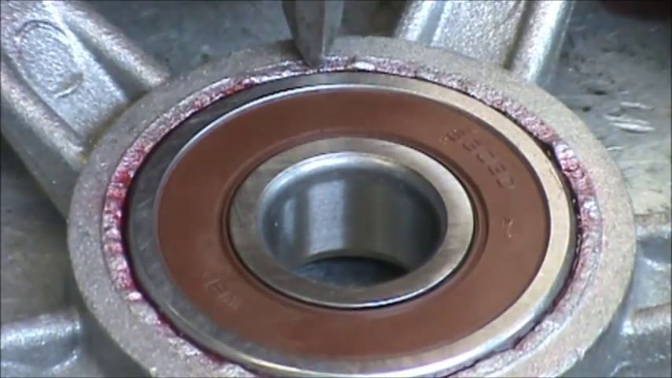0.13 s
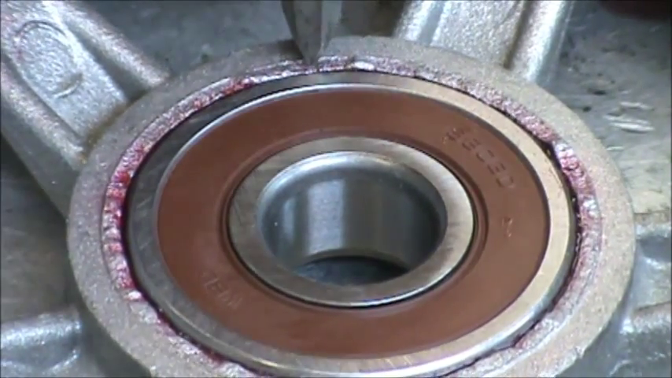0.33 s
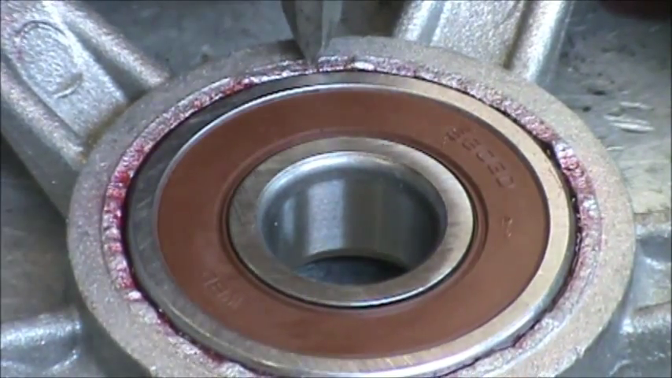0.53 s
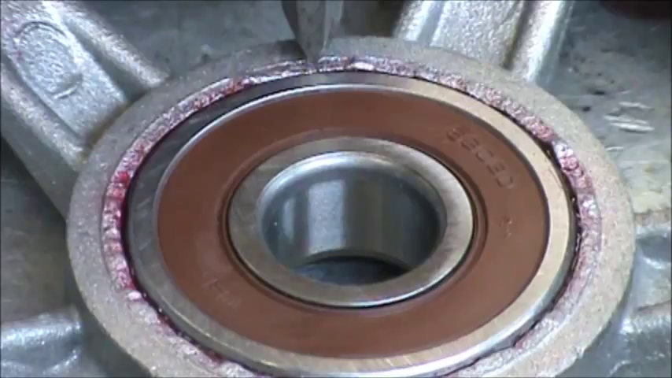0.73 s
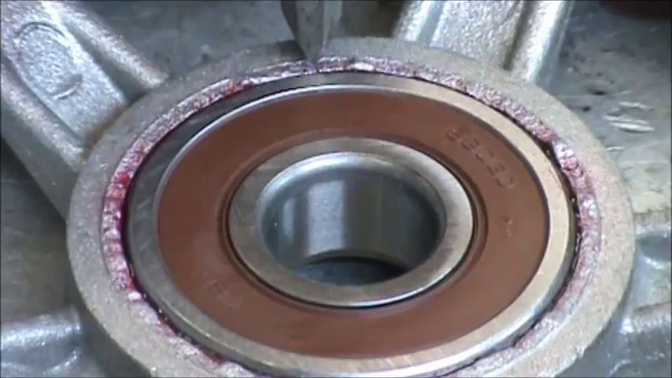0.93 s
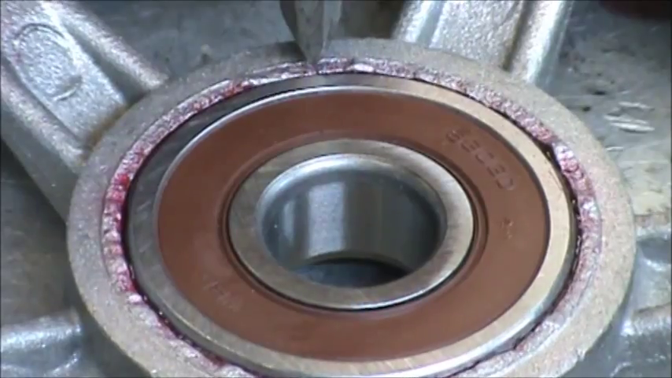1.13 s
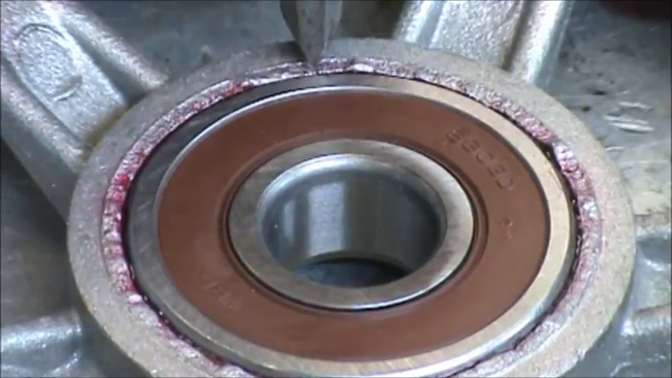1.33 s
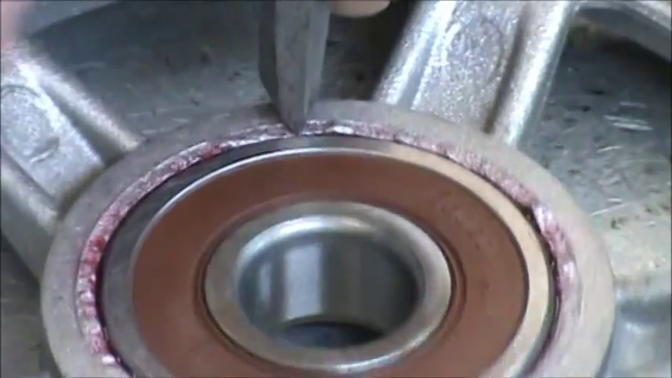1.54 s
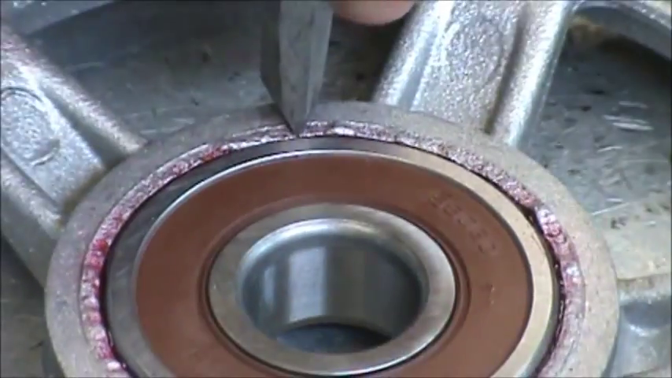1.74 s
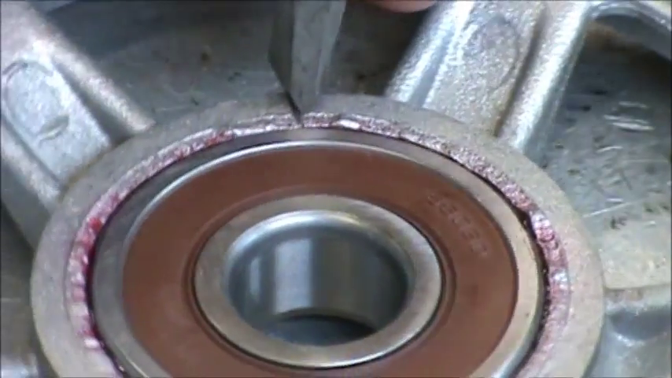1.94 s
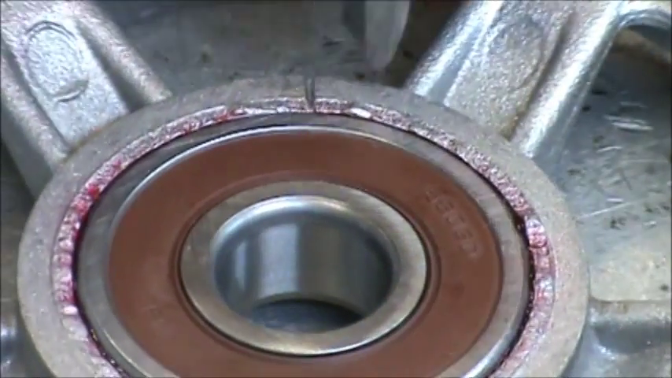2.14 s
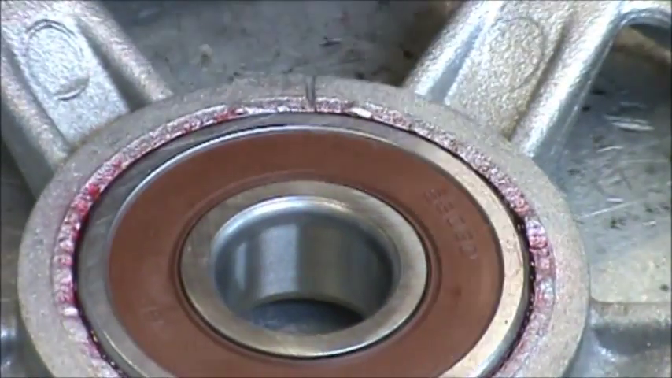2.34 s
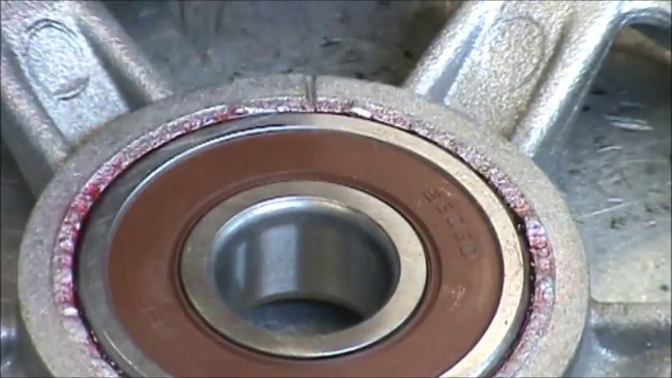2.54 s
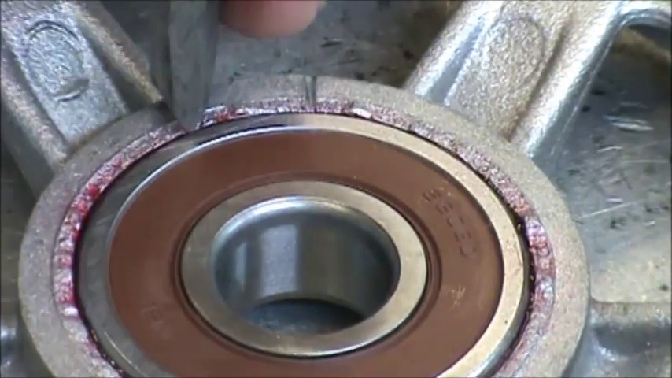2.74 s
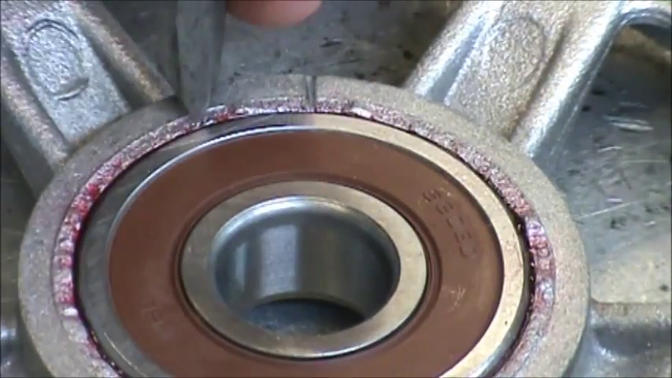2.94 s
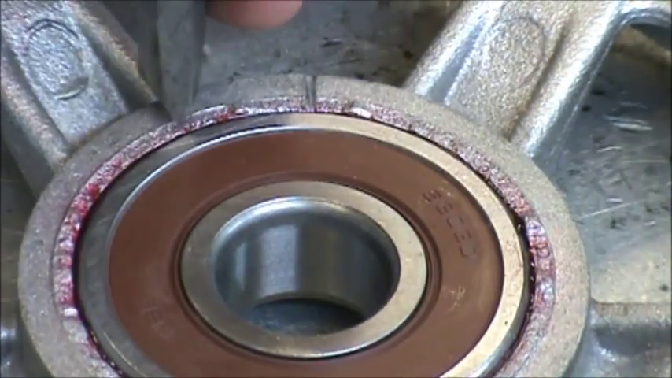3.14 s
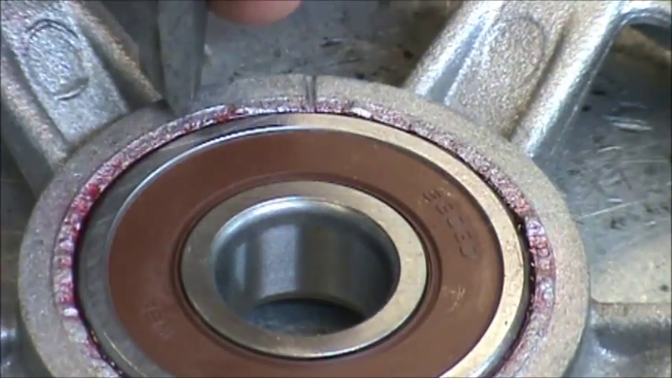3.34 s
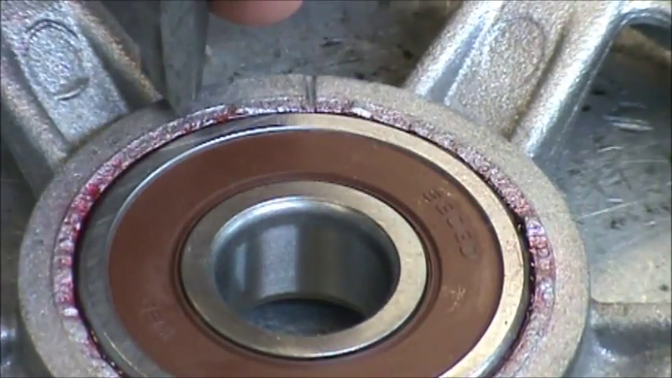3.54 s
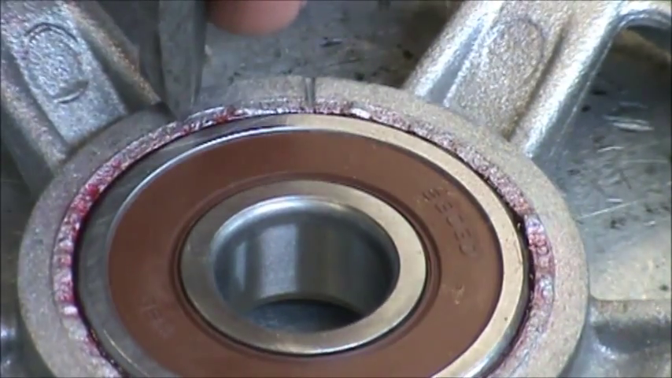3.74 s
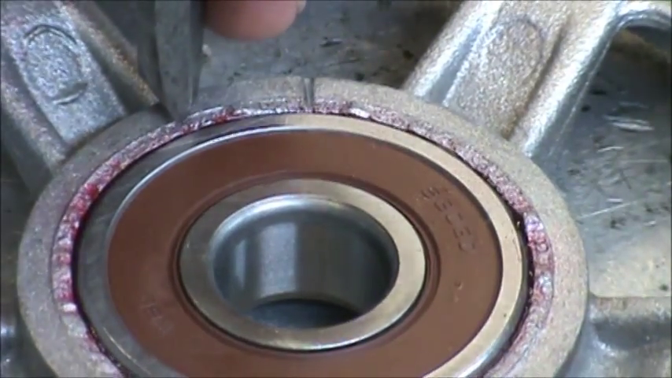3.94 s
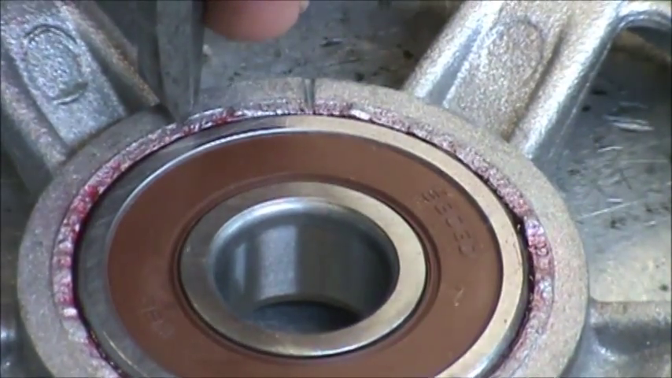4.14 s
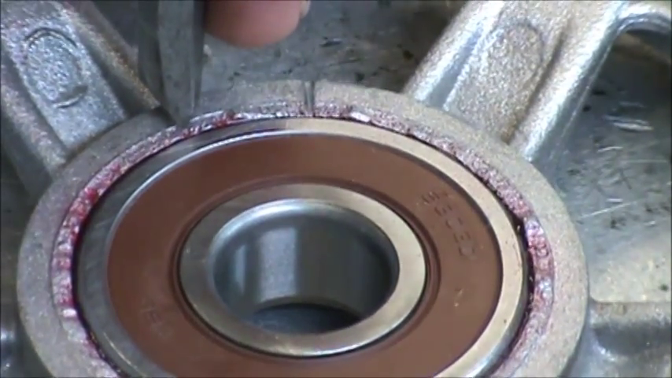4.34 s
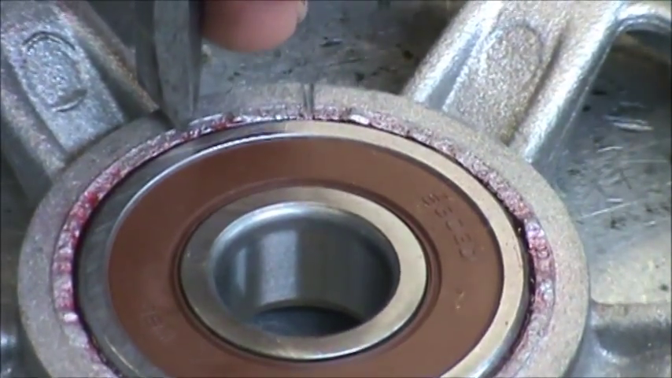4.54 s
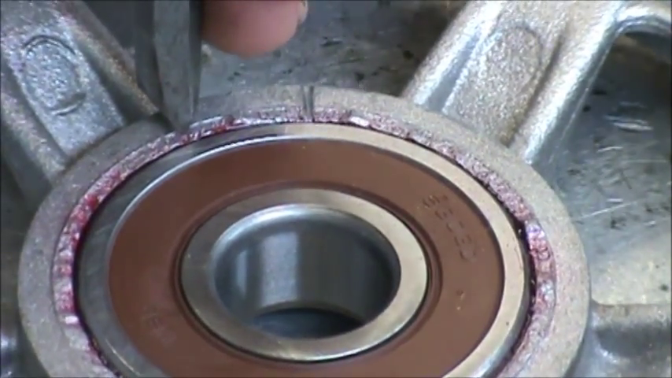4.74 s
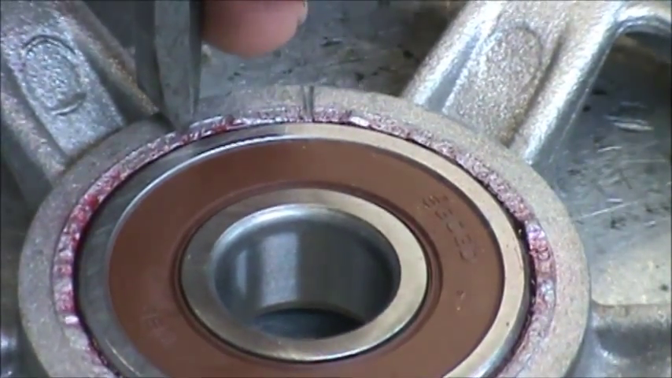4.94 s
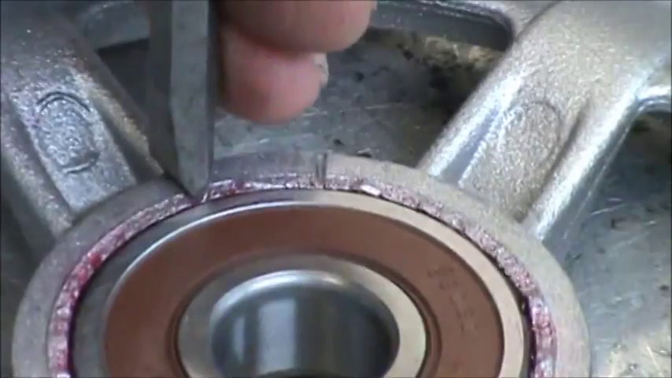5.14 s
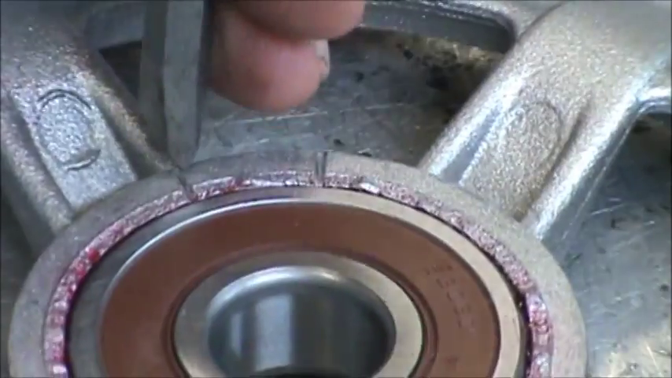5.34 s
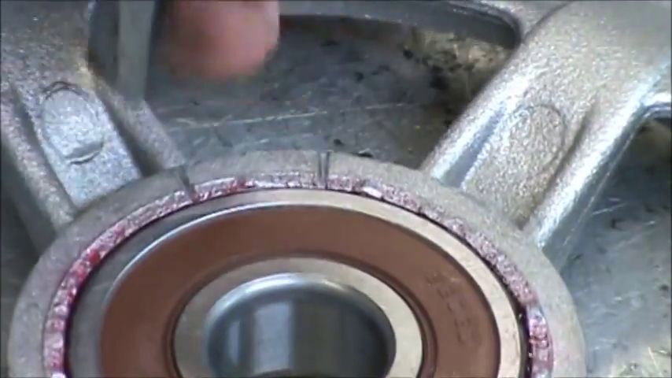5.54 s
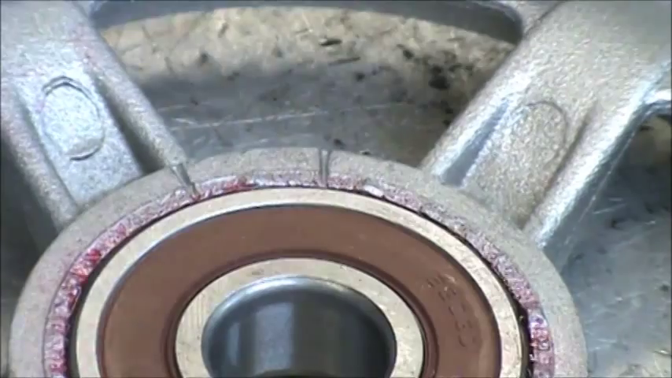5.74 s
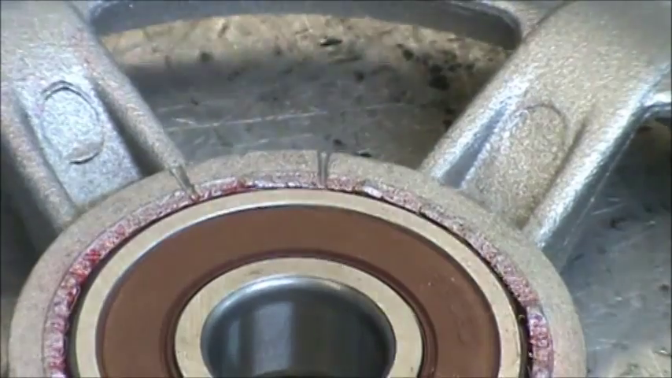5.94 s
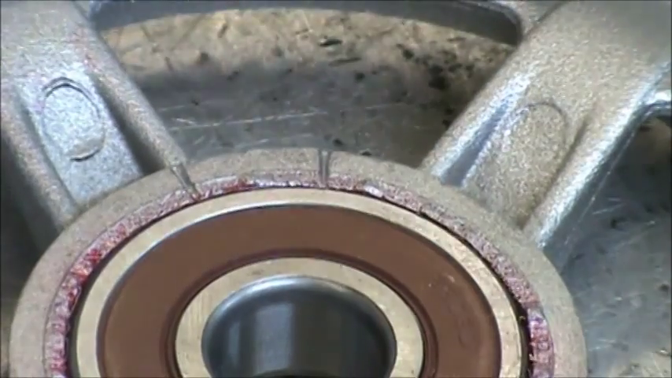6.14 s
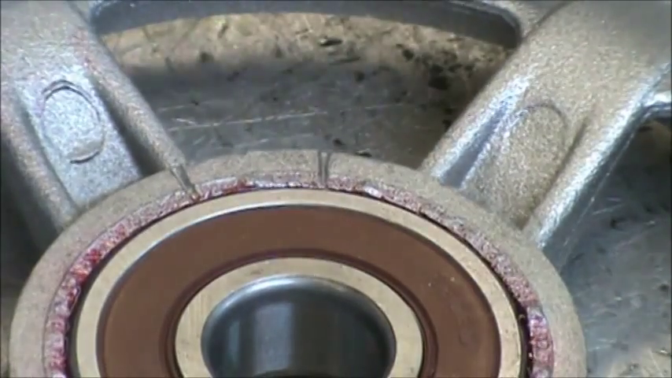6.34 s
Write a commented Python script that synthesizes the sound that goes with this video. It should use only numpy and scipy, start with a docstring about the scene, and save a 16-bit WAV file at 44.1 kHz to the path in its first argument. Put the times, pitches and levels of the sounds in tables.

```python
"""Low workshop air and motor hum, a light tick and knock, then a hammer drives a small chisel into the rim
of a cast wheel hub to stake a bearing: two runs of blows, each building to a hard one. The chisel rings,
hub and bench boom into the room. Between the runs the chisel ticks on the rim; at the end a tool is
put down. A camcorder's gain control flattens the blows and lets the hum creep back."""
import sys
import numpy as np
from scipy import signal
from scipy.fft import rfft, irfft, next_fast_len
from scipy.io import wavfile

SR = 44100
rng = np.random.default_rng(int(sys.argv[2]) if len(sys.argv) > 2 else 0)


def materialize(psi):
    """Save the field psi as 16-bit PCM at rate SR to the path in sys.argv[1].

    A 1-D psi becomes a single channel; in a 2-D psi each row is a channel.
    """
    bounded = np.clip(np.atleast_2d(psi).T, -1, 1)
    quanta = np.round(bounded * 32767).astype(np.int16)
    wavfile.write(sys.argv[1], SR, quanta)


N = 281973
TIME = np.arange(N) / SR
CHISEL_LOW_HZ, CHISEL_MID_HZ, CHISEL_HIGH_HZ = 4177, 7852, 8850

# Room tone colour. Each row: frequency in Hz, relative density in dB.
AIR_SPECTRUM = [(25, -2.5), (42, 6.5), (80, 1.5), (150, 3.5), (250, -0.5), (400, -2.5), (600, -5),
                (950, -9.5), (2000, -12), (4000, -17.5), (8000, -24), (15500, -30)]
# Room tone width. Each row: frequency in Hz, left-right likeness from 0 to 1.
ROOM_LIKENESS = [(100, 1), (350, 0.97), (600, 0.77), (1000, 0.55), (3000, 0.6), (10000, 0.62)]
# A motor nearby. Each row: pitch in Hz, level in dB.
MOTOR_PARTIALS = [(121, -50.5), (242, -45), (360.7, -46.5), (602.9, -49.5), (1680, -60), (2040, -56.5),
                  (2283, -60)]
# The chisel touches the rim. Each row: start in seconds, ring level in dB, ring tilt in dB per octave,
# scratch level in dB, scratch t60 in seconds.
RIM_TOUCHES = [(0.594, -30, -4, -25, 0.07), (1.916, -20, 22, -22, .02), (2.1548, -13.5, 23, -21.5, .04),
               (2.7741, -12, 0, -31.5, 0.018), (3.155, -23.5, -4, -33, .03), (5.586, -48, -3, -16, 0.007)]
# The ring of a touch. Each row: pitch in Hz, relative level in dB, t60 in seconds.
TICK_MODES = [(1090, -21.5, 0.19), (2815, -3, 0.022), (3010, -14, 0.085), (3800, -15, 0.023),
              (3920, -14.5, 0.054)]
# Scratch colour. Each row: frequency in Hz, relative density in dB.
SCRATCH_SPECTRUM = [(200, -2.5), (1000, 7), (4500, 2), (9000, -5.5), (15000, -15)]
# Dull contacts with the bench. Each row: start in seconds, level in dB.
BENCH_KNOCKS = [(0.596, -24.5), (0.622, -24), (6.2194, -11), (6.232, -12.5)]
# Knock colour. Each row: frequency in Hz, relative density in dB.
KNOCK_SPECTRUM = [(59, -40), (100, 3.5), (194, -9.5), (425, 2.5), (1300, -10.5), (1530, -0.5), (2000, -13),
                  (2320, -11), (14000, -41.5)]
# Hammer blows; a glancing contact sizzles, a loose grip lets the chisel ring.
# Each row: start in seconds, force in dB, added sizzle in dB, added chisel ring in dB.
HAMMER_BLOWS = [(0.714, -3.5, -17.5, -2), (0.9479, 5.5, -12, 1), (1.136, 7.5, 6.5, -2),
                (1.5246, 18.5, 13.5, -8), (3.9976, 1.5, -4.5, 3), (4.229, 2.5, 6.5, 8.5),
                (4.4632, 4.5, 10, 4.5), (4.634, 6, 4, 0.5), (5.0451, 21, 11, -11.5)]
# Clang colour. Each row: frequency in Hz, relative density in dB.
CLANG_SPECTRUM = [(40, -32), (115, -17), (180, -3), (330, 4.5), (700, -1), (1000, -8), (1500, -12),
                  (2100, -16), (2800, -12.5), (3500, -15.5), (5100, -14), (6800, -21), (9500, -14.5),
                  (11000, -29.5), (15000, -46.5)]
# The clang's tail in the workshop. Each row: frequency in Hz, t60 in seconds.
ROOM_DECAY = [(100, 0.6), (300, 0.42), (1000, 0.56), (3000, 0.53), (6000, 0.49), (10000, 0.39),
              (15000, 0.14)]
# Modes of bench, hub and chisel. Each row: pitch in Hz, relative level in dB, longest t60 in seconds.
STRUCK_MODES = [(183.1, -12.5, 0.58), (237.2, -10, 0.52), (305.5, -15, 0.56), (479, -15.5, 0.56),
                (681.5, -17, 0.46), (1106, -10, 0.48), (1530, -23.5, 0.48), (2960, -17, 0.39),
                (4110, -21.5, 0.57), (CHISEL_LOW_HZ, -9, 0.44), (4580, -26, 0.51), (4935, -23.5, 0.41),
                (5470, -27, 0.19), (6215, -26.5, 0.51), (7175, -33, 0.42), (CHISEL_MID_HZ, -11.5, 0.4),
                (9200, -28, 0.39), (CHISEL_HIGH_HZ, -21, 0.35), (7800, -26, 0.3), (9750, -18.5, 0.28),
                (10158, -21.5, 0.28), (11000, -30, 0.26), (13000, -40, 0.32)]
# Each notch favours other chisel modes. Each row: pitch in Hz, boost on the first notch in dB,
# boost on the second in dB, dB gained per dB of sizzle.
NOTCH_SEATING = [(CHISEL_LOW_HZ, -0.9, 0.62, 0.083), (CHISEL_MID_HZ, 0.5, -3, -0.25),
                 (CHISEL_HIGH_HZ, -3, 1.8, 0.35)]
# Width of clang, scratch and knock. Each row: frequency in Hz, left-right likeness from 0 to 1.
WORK_LIKENESS = [(60, 0.7), (120, 1), (200, 0.88), (400, 1), (600, 0.99), (1000, 0.9), (1700, 0.83),
                 (4000, 0.93), (15000, 0.87)]
# Off-centre sound at two microphone ports. Each row: frequency in Hz, left lead in radians at offset 1.
PORT_LEAD = [(60, -0.54), (180, -0.73), (500, -1.04), (950, -0.78), (1800, -0.52), (4000, -0.38),
             (10000, -0.27)]


def from_db(db):
    """Decibels to gain."""
    return 10 ** (np.asarray(db) / 20)


def rms_one(x):
    """Scale to rms 1."""
    return x / np.sqrt(np.mean(np.abs(x) ** 2) + 1e-20)


def at_hz(points, hz):
    """Read a table on a log-frequency axis."""
    frequencies, values = np.transpose(points)
    return np.interp(np.log(hz), np.log(frequencies), values)


def drift(rate_hz):
    """A smooth random wobble, rms about 1."""
    step, settle = 40, 2000
    pole = np.exp(-2 * np.pi * rate_hz * step / SR)
    white = rng.standard_normal(N // step + settle + 2)
    slow = signal.lfilter([1], [1, -2 * pole, pole * pole], white)[settle:]
    return np.interp(np.arange(N) / step, np.arange(len(slow)), rms_one(slow))


def dying(times, levels_db, t60, swell_s):
    """Envelope of hits that swell and die away; their powers add."""
    power = np.zeros(N)
    for at, db, rise in zip(times, levels_db, np.broadcast_to(swell_s, len(times))):
        start = int(at * SR)
        age = TIME[:min(N - start, int(2 * t60 * SR))]
        attack = 1 - np.exp(-age / max(rise, 1e-5))
        power[start:start + len(age)] += (from_db(db - 60 * age / t60) * attack) ** 2
    return np.sqrt(power)


def noise_bands(spectrum, likeness=WORK_LIKENESS):
    """Stereo noise in 0.4-octave bands, as (Hz, band); together about rms 1."""
    edges = np.geomspace(25, 17000, 25)
    centres = np.sqrt(edges[1:] * edges[:-1])
    gains = from_db(at_hz(spectrum, centres)) * np.sqrt(np.diff(edges))
    white = rng.standard_normal((2, 2, N))   # neighbouring bands get unrelated noise
    for k, (hz, gain) in enumerate(zip(centres, gains / np.linalg.norm(gains))):
        bandpass = signal.butter(2, edges[k:k + 2], "band", fs=SR, output="sos")
        mid, side = rms_one(signal.sosfilt(bandpass, white[k % 2]))
        alike = np.clip(at_hz(likeness, hz), 0, 1)
        spread = np.sqrt((1 - alike) / 2) * np.array([side, -side])
        yield hz, gain * (np.sqrt((1 + alike) / 2) * mid + spread)


def tone(hz, scatter, width_hz):
    """A mode heard in a room: reflections make its level and phase wander. Rms 1."""
    phase = 2 * np.pi * (hz * TIME + rng.random())
    in_phase = (1 + scatter * drift(width_hz)) * np.cos(phase)
    return rms_one(in_phase + scatter * drift(width_hz) * np.sin(phase))


def workshop(air_db=-35, flutter_db=2.5):
    """The bed: gently fluttering room noise and the hum of a motor."""
    bands = noise_bands(AIR_SPECTRUM, ROOM_LIKENESS)
    air = sum(band * from_db(flutter_db * drift(6.3)) for hz, band in bands)
    hum = sum(from_db(db) * tone(hz, scatter=0.27, width_hz=2.25) for hz, db in MOTOR_PARTIALS)
    return from_db(air_db) * air + hum


def chisel_ticks(room_db=-21.5, room_t60=0.43, pivot_hz=3000):
    """The chisel's tip is set on the rim: a scratch and a short ring."""
    starts, ring_db, tilt, scratch_db, scratch_t60 = np.transpose(RIM_TOUCHES)
    swell_s = 0.023 * scratch_t60   # longer scratches start softer
    scratches = sum(dying([at], [db], t60, rise)
                    for at, db, t60, rise in zip(starts, scratch_db, scratch_t60, swell_s))
    out = scratches * sum(band for hz, band in noise_bands(SCRATCH_SPECTRUM))
    for hz, mode_db, t60 in TICK_MODES:
        level = ring_db + mode_db + tilt * np.log2(hz / pivot_hz)
        direct = dying(starts, level, t60, swell_s)
        room = dying(starts, level + room_db, room_t60, swell_s=0.001)
        out += np.hypot(direct, room) * tone(hz, scatter=0.75, width_hz=190)
    return out


def bench_knocks(room_db=-14.0):
    """A tool lands on the bench in two dull contacts, faintly at the start and louder at the end."""
    starts, db = np.transpose(BENCH_KNOCKS)
    direct = dying(starts, db, t60=0.055, swell_s=0.00089)
    room = dying(starts, db + room_db, t60=0.43, swell_s=0.001)
    return np.hypot(direct, room) * sum(band for hz, band in noise_bands(KNOCK_SPECTRUM))


def blows():
    """The hammer's columns, plus a trim in dB: the bench's boom grows more slowly than the force."""
    starts, force, sizzle, chisel = np.transpose(HAMMER_BLOWS)
    boom = 0.34 - 0.1427 * force
    return starts, force, sizzle, chisel, boom


def clang(boom_hz=1200, sizzle_hz=10000, build_s=0.0084, echo_s=0.034, echo_db=-7.5, bloom_db=8.5):
    """The crowded modes of hub and bench: a bright crack, early reflections, a boom filling the room."""
    starts, force, sizzle, _, boom = blows()
    out = np.zeros((2, N))
    for hz, band in noise_bands(CLANG_SPECTRUM):
        low = 1 / (1 + (hz / boom_hz) ** 2)
        high = 1 / (1 + (sizzle_hz / hz) ** 6)
        level = force + high * sizzle   # a hard, short contact reaches further up
        body = level + low * boom
        tail = dying(starts, body, at_hz(ROOM_DECAY, hz), swell_s=build_s * low + 0.0025)
        crack = dying(starts, level, t60=0.026, swell_s=0.001) * (1 - low)
        # the first reflections come back together, strongest in the low mids
        bloom = bloom_db * np.exp(-(np.log2(hz / 660) / 0.45) ** 2)
        echo = dying(starts + echo_s, body + echo_db + bloom, t60=0.22, swell_s=0.0045)
        out += band * np.sqrt(tail ** 2 + crack ** 2 + echo ** 2)
    return out


def mode_drive_db(hz, second_notch_s=2.77):
    """How hard each blow drives a mode, by the part that the mode belongs to."""
    starts, force, sizzle, chisel, boom = blows()
    first_notch = starts < second_notch_s
    for pitch, first_db, second_db, follows in NOTCH_SEATING:
        if abs(hz / pitch - 1) < 0.04:   # the chisel's own modes
            return force + chisel + np.where(first_notch, first_db, second_db) + follows * sizzle
    if hz < 900:   # the bench
        return force + boom
    if hz < 4400:   # the hub rings more from the second notch, next to a spoke
        return force + np.where(first_notch, -2, 1) - 0.046 * force
    if hz < 9000:   # the rim is damped as the edge bites into it
        return force + 2.5 - 0.0456 * force
    return force - 7.5 + 0.9 * sizzle   # the edge


def ringing(direct_db=4.0, tilt_db_per_octave=-1.5):
    """Each struck mode sounds first as a clean ring, then as its beating, scattered tail in the room."""
    starts = blows()[0]
    out = np.zeros(N)
    for hz, db, t60 in STRUCK_MODES:
        tail_t60 = min(t60, 1.15 * at_hz(ROOM_DECAY, hz))   # no mode rings much longer than the room
        level = db + mode_drive_db(hz)
        clean_db = level + direct_db + tilt_db_per_octave * np.log2(hz / 1000)
        scattered = tone(hz, scatter=1.2, width_hz=8 + 0.35 * np.sqrt(hz))
        clean = np.sin(2 * np.pi * (hz * TIME + rng.random()))
        out += clean * dying(starts, clean_db, t60=0.17, swell_s=1 / hz)
        out += scattered * dying(starts, level, tail_t60, swell_s=0.0016)
    return out


def bench_thuds(trim_db=-25.0):
    """The bench gives under each blow with a short, low thump."""
    starts, force, _, _, boom = blows()
    envelope = dying(starts, force + boom + trim_db, t60=0.05, swell_s=0.0046)
    return envelope * tone(hz=95, scatter=2.7, width_hz=18)


def at_ports(sound, offset, pan_db):
    """Sound from one side reaches the two close microphone ports out of phase."""
    size = next_fast_len(N + SR // 10)
    hz = np.arange(size // 2 + 1) * SR / size
    lead = offset * at_hz(PORT_LEAD, hz + 1)
    spectrum = rfft(sound, size) * np.exp(0.5j * np.array([lead, -lead]))
    return irfft(spectrum, size)[:, :N] * from_db([[pan_db / 2], [-pan_db / 2]])


def scene():
    """The work on the bench, close by and off to one side, and the room around it."""
    work = at_ports(clang() + ringing() + bench_thuds() + chisel_ticks(), offset=1.11, pan_db=0.34)
    return work + at_ports(bench_knocks() + workshop(), offset=0.23, pan_db=0.5)


def released(db, db_per_s):
    """Catch each peak and let it sink at a steady rate."""
    return np.maximum.accumulate(db + db_per_s * TIME) - db_per_s * TIME


def gain_control(x, limit_db, slope=1.2, held_db=11.5, sense_s=0.0026, attack_s=0.00011):
    """A fast limiter levels each blow; part of its cut is held and given back over seconds."""
    sense, attack = np.exp(-1 / (SR * np.array([sense_s, attack_s])))
    power = signal.lfilter([1 - sense], [1, -sense], np.mean(x ** 2, axis=0))
    excess = slope * np.maximum(10 * np.log10(power + 1e-12) - limit_db, 0)
    fast = released(excess, db_per_s=249.0)
    slow = released(np.minimum(excess, held_db), db_per_s=2.5)
    cut_db = signal.lfilter([1 - attack], [1, -attack], np.maximum(fast, slow))
    return x * from_db(-cut_db)


def record(dry, headroom=12.0, stopband_hz=16700):
    """The hardest blows overload the preamp; then gain control, rounded peaks and a steep top cut."""
    driven = headroom * np.tanh(dry / headroom)
    limited = np.tanh(gain_control(driven, limit_db=-8.5))
    top_cut = signal.cheby2(14, 60, stopband_hz, fs=SR, output="sos")
    return signal.sosfilt(top_cut, limited)


dry = scene()
out = record(dry)
materialize(out)
```